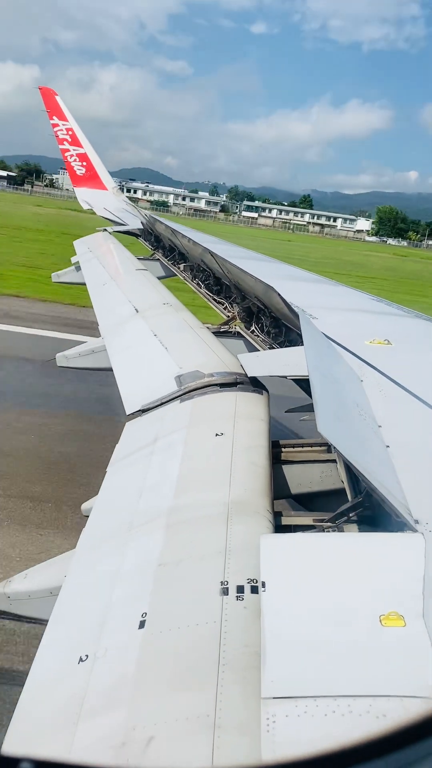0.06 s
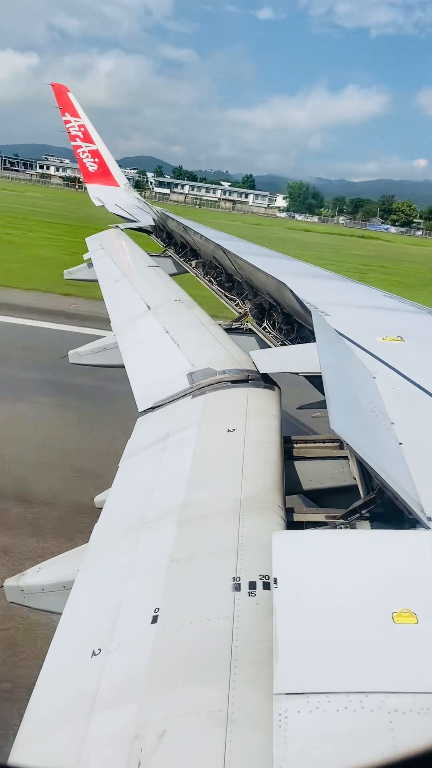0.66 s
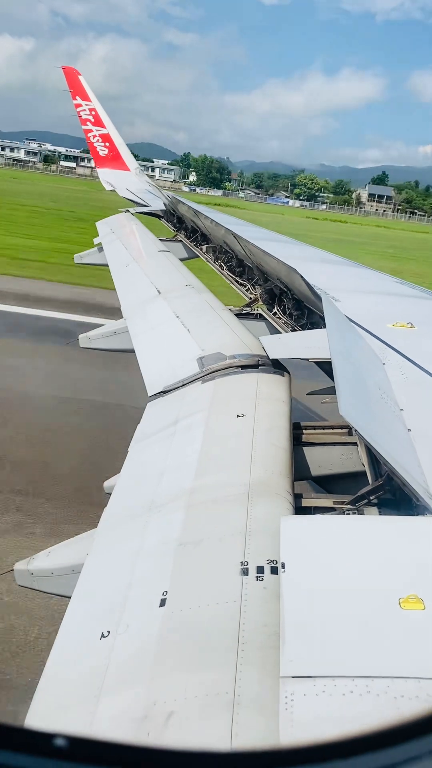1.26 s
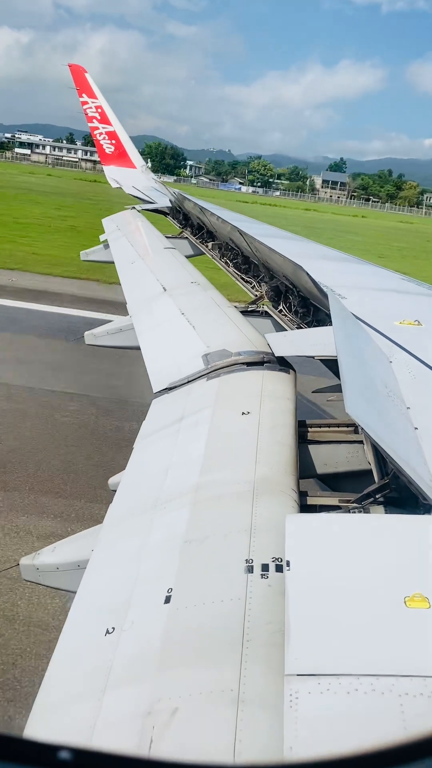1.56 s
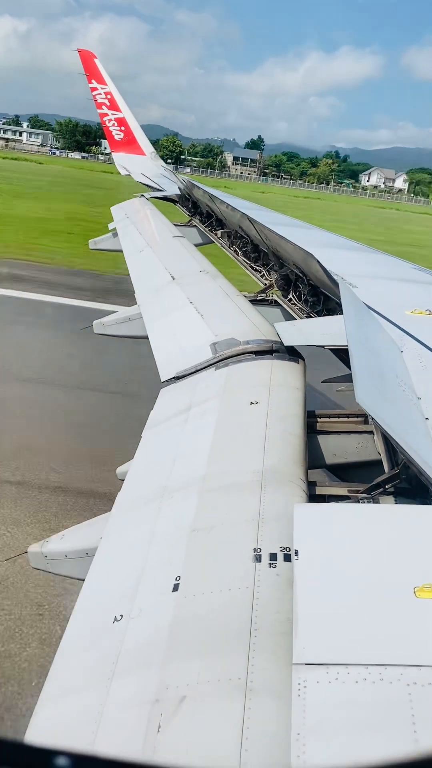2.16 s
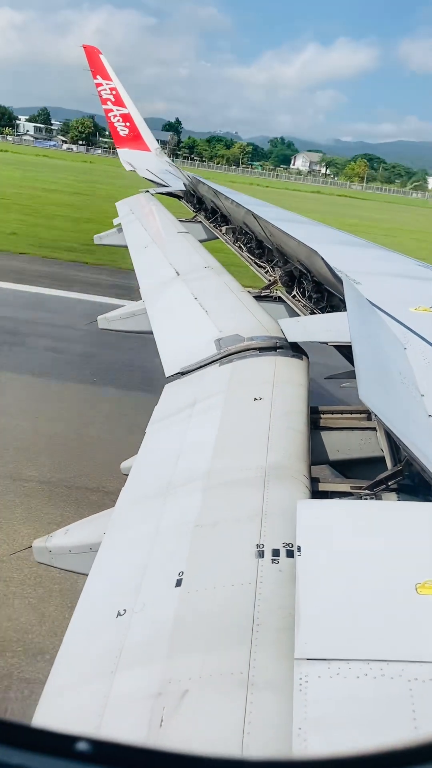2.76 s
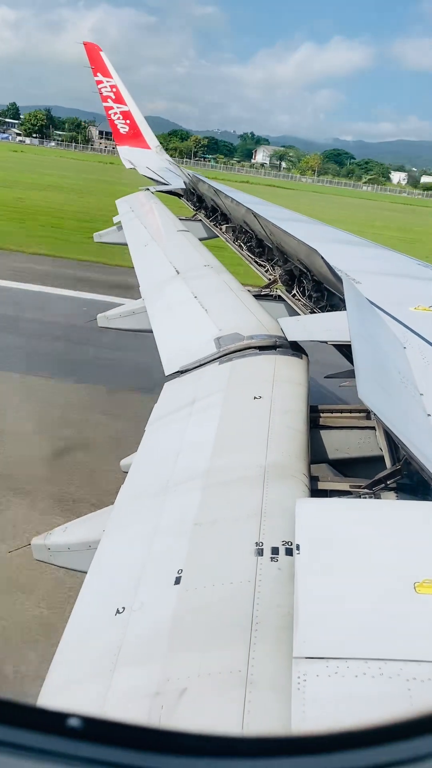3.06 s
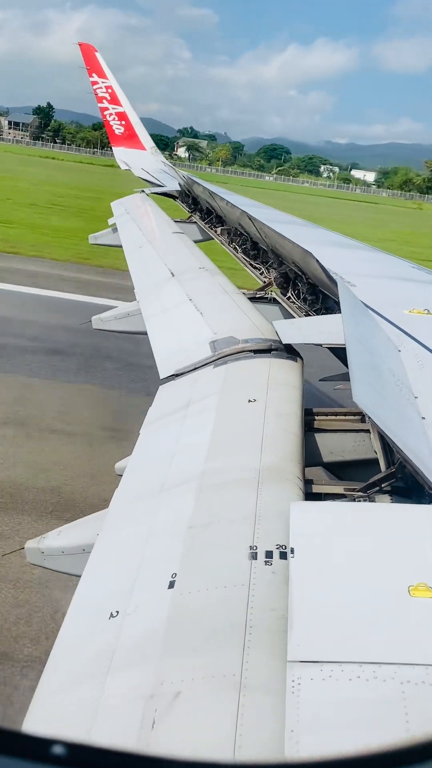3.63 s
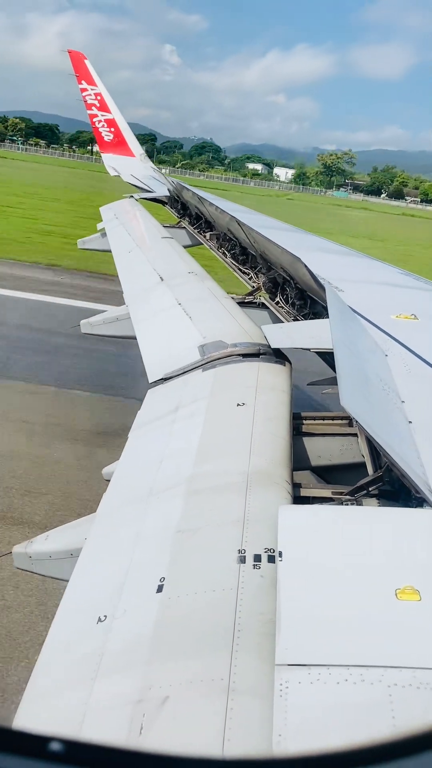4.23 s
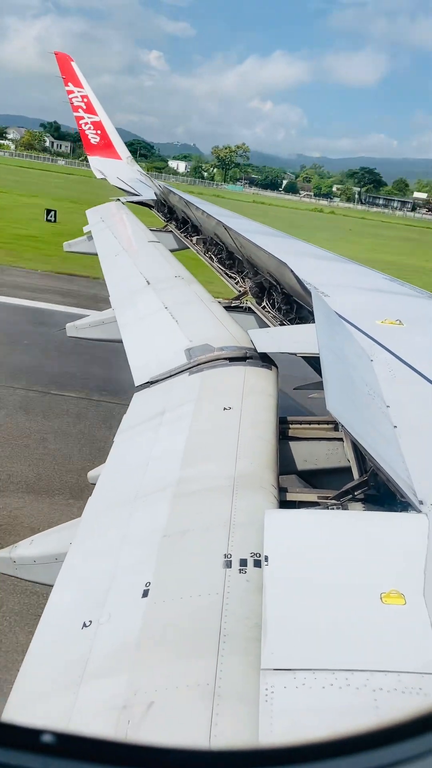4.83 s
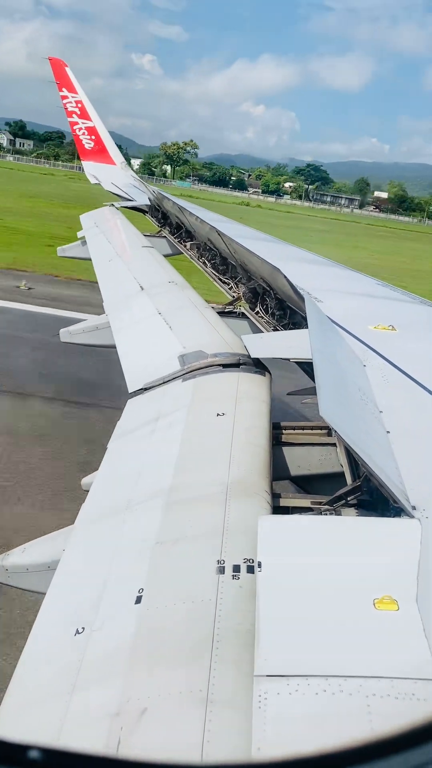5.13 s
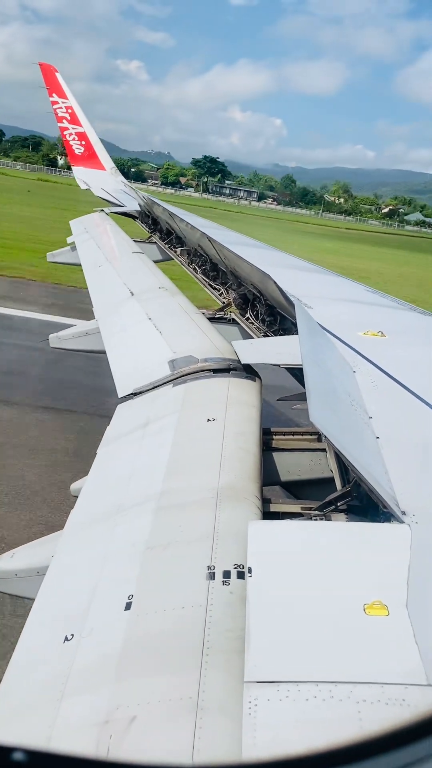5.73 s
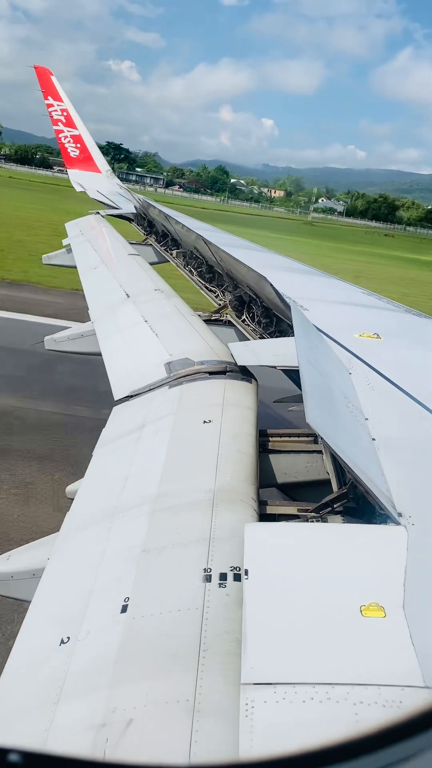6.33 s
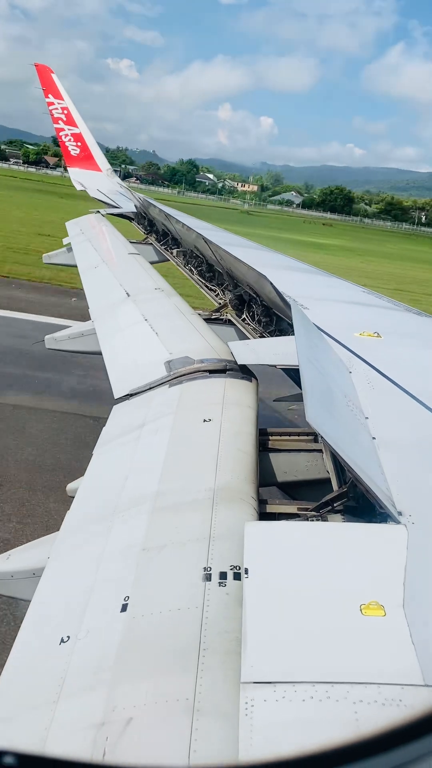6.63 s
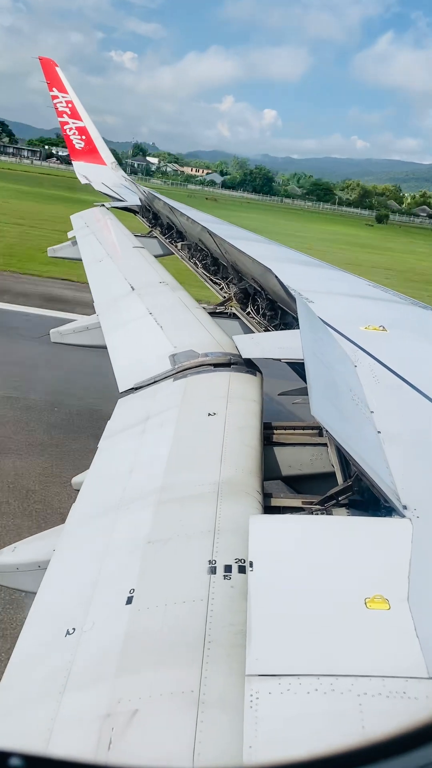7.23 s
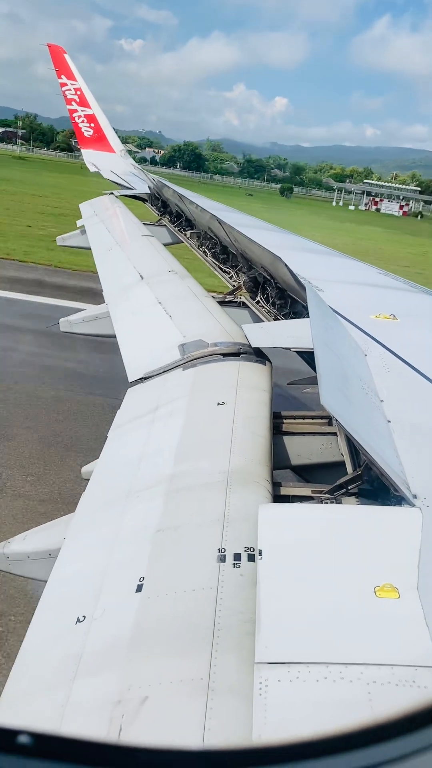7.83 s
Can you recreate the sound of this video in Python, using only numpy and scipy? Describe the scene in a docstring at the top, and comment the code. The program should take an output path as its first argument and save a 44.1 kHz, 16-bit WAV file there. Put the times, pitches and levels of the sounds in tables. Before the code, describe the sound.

Deep wheel rumble and engine hum drone inside an airliner rolling along a runway, while cabin trim ticks faintly.

```python
"""Runway rumble in a slowing airliner, heard from a window seat over the wing.
The rough surface shakes the cabin; out-of-round tyres drone on orders of their falling spin rate.
Engine hum sinks to idle, a pump and fans whine, air rushes past the spoilers.
Shaken trim chatters, buzzes, ticks and squeaks; a fitting clinks, a locker knocks, the lining thuds.
A limiter holds the peaks."""
import sys
import numpy as np
from scipy import signal
from scipy.fft import rfft, irfft, next_fast_len
from scipy.io import wavfile
from scipy.ndimage import uniform_filter1d, minimum_filter1d, map_coordinates

SR = 44100
rng = np.random.default_rng(int(sys.argv[2]) if len(sys.argv) > 2 else 0)


def generate_wav(signal):
    """Clip the signal to [-1, 1] and save it as 16-bit WAV at the path in sys.argv[1]."""
    frames = np.transpose(np.atleast_2d(signal))
    scaled = np.clip(frames, -1, 1) * 32767
    pcm = np.round(scaled).astype(np.int16)
    wavfile.write(sys.argv[1], SR, pcm)


N = 351918

# wheel spin under braking: t/s, f/Hz
SPIN_HZ = [(0, 17.17), (6, 14.22), (8, 12.9)]
# noise spectra: f/Hz, relative density/dB
RUMBLE_SPECTRUM = [(12, -23.5), (25, -12), (36, -7.5), (47, -0.5), (60, 0.5), (70, 1), (88, 5), (112, -1.5),
                   (132, -4), (155, -2.5), (200, -11), (260, -25.5), (400, -91.5)]
BOOM_SPECTRUM = [(130, -20), (200, -2.5), (240, 0.5), (280, -2), (325, 0.5), (375, -5), (440, -10),
                 (520, -15.5), (620, -34), (1000, -85.5)]
AIR_SPECTRUM = [(250, -14.5), (450, 4), (540, 2), (630, 0), (770, 3), (870, -4), (1120, -10), (1280, -11),
                (1550, -16), (1770, -19), (2000, -18), (2600, -19.5), (3700, -25.5), (5500, -29.5),
                (9000, -37), (12000, -40), (13500, -48.5)]
CHATTER_SPECTRUM = [(700, -23), (1500, -1.5), (2600, -0.5), (3300, 1), (3850, -2.5), (4350, 3),
                    (4800, -1.5), (5800, -5), (9200, -8.5), (12000, -9.5), (13200, -21), (15500, -29.5)]
CLACK_SPECTRUM = [(700, -32), (1500, -6), (2700, 4.5), (4000, -1.5), (5800, -3), (8000, -13.5),
                  (15000, -20.5)]
SNAP_SPECTRUM = [(3000, -26), (6000, -4), (10000, 0.5), (13000, -3), (16000, -7.5)]
LOCKER_SPECTRUM = [(400, -17), (650, -4), (800, 2), (950, -8.5), (1300, -19.5), (2000, -24.5), (4000, -43),
                   (9000, -75)]
LINING_SPECTRUM = [(250, -20), (480, 3.5), (750, -5), (1300, -19), (3000, -45), (9000, -85.5)]
# runway roughness: t/s, boom gain/dB
BUMPS_DB = [(0, 0.5), (.2, 2.5), (.7, 0.5), (1.3, 0.9), (2, 1), (2.6, -1.1), (2.95, 0.8), (3.9, -1),
            (5, -0.3), (5.8, -1.5), (6.95, 1.5), (7.9, 0.7)]
# tyre pushes: spin order, level/dB
TYRE_ORDERS = [(3, -1.5), (4, 1), (5, 1), (7, 1.5), (8, -2)]
# gear-to-cabin response: f/Hz, gain/dB
AIRFRAME_DB = [(40, -29), (47, -25), (48.8, -13), (51, -11), (52.5, -18.5), (54.5, -13.5), (57, -18),
               (60.5, -13), (63, -17.5), (67, -24.5), (73, -34.5), (77.5, -23), (79.5, -13.5),
               (82.6, -12.5), (83.8, -24.5), (86, -27), (101, -26.5), (107, -25), (113, -28.5), (120, -21),
               (126, -27.5), (140, -25.5)]
# engine run-down: t/s, f/Hz
ENGINE_HZ = [(0, 457.3), (3.0, 419), (3.8, 409.4), (4.3, 408.8), (8, 406.2)]
# panel resonances for engine harmonics 3 and 4: f/Hz, half-width/Hz, level/dB
PANEL_MODES = [(1367, 10, -54), (1663, 24, -56.3)]
# source envelopes: t/s, relative level/dB
HUM_DB = [(0, -39), (1.2, -38), (2.55, -45), (2.9, -30), (3.3, -40), (3.95, -40), (4.2, -33.5), (5.3, -30),
          (5.65, -32), (6, -30.5), (6.55, -30.5), (7.05, -41), (7.4, -31.5), (7.9, -39.5)]
PUMP_DB = [(0, -57), (1.3, -49), (1.7, -55.5), (4.5, -53.5), (5, -49.5), (5.5, -51.5), (6.2, -53.5),
           (6.45, -45.5), (6.8, -45.5), (7.3, -49.5), (7.55, -44.5), (8, -50.5)]
AIR_SWELL_DB = [(0, 0), (.8, 0.2), (2.25, 0.9), (3.2, 0.3), (5.1, 0), (5.75, -0.4), (6.25, -1), (6.8, 0.3),
                (7.7, 1.4)]
CHATTER_DB = [(0, -56), (.3, -55), (.45, -49), (.75, -46.5), (1.2, -50), (1.45, -57), (2.15, -58),
              (3.1, -51.5), (4.4, -49.5), (5.1, -50.5), (5.45, -53.5), (6.4, -52.5), (6.7, -49),
              (7.28, -49.5), (7.37, -60.5), (7.46, -49), (7.58, -45.5), (7.78, -56), (8, -52)]
RATTLE_DB = [(0, -63), (.7, -58.5), (1.5, -61.5), (3.3, -58), (5, -61.5), (6.5, -65), (7.1, -63.5),
             (7.6, -60.5)]
# fans and electrics: f/Hz, level/dB
WHINES = [(2639, -66.5), (3628, -65)]
# air and nearby trim at spaced microphones: f/Hz, left-right coherence (clipped to +-1 in use)
AIR_COHERENCE = [(300, 0.14), (750, 0.039), (1200, 0.17), (1950, 0.64), (3000, -0.11), (4200, 0.42),
                 (4700, -0.055), (5400, 0.6), (6300, -0.54), (7300, -3.1), (8600, -0.12), (10700, 1),
                 (13200, 0.85), (15500, .5)]
TRIM_COHERENCE = [(1500, 0), (4500, 0), (5500, 1), (7300, 1), (11000, 0.66), (15000, 0.48)]
# buzzing fittings: f/Hz, relative level/dB
RATTLES = [(1265, -5), (1970, -4), (2500, 1), (2760, -4), (4310, -5.5)]
# trim contacts: t/s, relative level/dB, snap gain/dB, t60/s
TICKS = [(0.198, -36, -7.5, .06), (0.6185, -33.5, -14.5, .08), (0.7072, -30.5, -7, .06),
         (0.714, -32.5, -8, .08), (1.0148, -36, -12, .05), (1.052, -30.5, -24.5, .04),
         (1.1757, -26.5, -26.5, 0.071), (1.2707, -28.5, -23, .045), (1.6868, -30.5, -8, 0.11),
         (1.9485, -33, -20, .08), (2.2605, -28.5, -28, .06), (2.655, -33, -20, .14),
         (2.8448, -30.5, -18.5, .09), (3.1009, -29, -15.5, .09), (3.362, -31, -16.5, .09),
         (3.5029, -31, -7.5, .055), (3.537, -33, -10.5, .06), (3.676, -33.5, -12.5, .06),
         (3.8046, -33, -12.5, .06), (3.9731, -35, -9.5, .06), (4.4064, -33.5, -15.5, .1),
         (4.4435, -32, -17.5, .1), (4.6044, -34, -7.5, .09), (5.06, -31, -19, 0.077),
         (5.0826, -32, -15, 0.07), (5.7887, -36.5, -14, .1), (5.8865, -34, -18.5, .06),
         (6.1789, -35, -12.5, .05), (6.5973, -32.5, -7.5, .07), (6.988, -25, -14.5, 0.035),
         (7.1232, -32, -18, .12), (7.2125, -32.5, -7, .04), (7.231, -35.5, -10.5, 0.06),
         (7.27, -29.5, -9, .06), (7.282, -30.5, -12.5, .05), (7.2968, -28, -11, 0.1),
         (7.453, -29, -14, .037), (7.5281, -29, -9, .06), (7.55, -29, -6, .045), (7.6842, -31.5, -7.5, .14),
         (7.7674, -33, -9, .06), (7.7774, -32.5, -12, 0.062), (7.8171, -35.5, -9, .07),
         (7.863, -35, -10.5, .05), (7.8745, -32, -9.5, .09), (7.9374, -33, -6.5, .11)]
# panel rubs: t/s, length/s, f/Hz, level/dB
SQUEAKS = [(0.617, 0.03, 3100, -49), (0.64, 0.024, 2890, -46), (0.703, 0.019, 2830, -50),
           (0.707, 0.036, 6130, -55), (1.682, 0.018, 2810, -44), (1.698, 0.028, 2880, -46),
           (1.679, 0.056, 6170, -54), (7.296, 0.03, 3130, -48), (7.378, 0.077, 3335, -48),
           (7.478, 0.087, 3280, -55)]
# metal fitting modes: f/Hz, gain/dB, t60/s
FITTING_MODES = [(4102, -8, .15), (5500, -5.5, 0.14), (9205, -15.5, .1)]
# blows on fitting, locker and lining: t/s, level/dB
CLINKS = [(1.054, -51), (1.177, -46), (1.272, -47.5), (7.69, -47), (7.876, -42)]
KNOCKS = [(1.172, -25.5), (5.06, -27.5), (6.098, -27.5), (6.165, -28)]
THUDS = [(2.965, -25.5), (7.465, -31)]


def amp(db):
    """Decibels to gain."""
    return 10 ** (np.asarray(db) / 20)


def unit(x):
    """x at rms 1."""
    return x / np.sqrt(np.mean(x ** 2) + 1e-20)


def at_hz(table, hz):
    """Table read on a log frequency axis."""
    knots_hz, values = np.transpose(table)
    return np.interp(np.log(hz + 1), np.log(knots_hz + 1), values)


def curve(table):
    """Time table read at every sample."""
    return np.interp(np.arange(N) / SR, *np.transpose(table))


def wobble(rate_hz):
    """Smooth random curve, rate_hz knots a second."""
    knots = rng.standard_normal(int(N * rate_hz / SR) + 4)
    return map_coordinates(knots, [np.arange(N) * rate_hz / SR])


def filtered(x, response):
    """x through a frequency response."""
    size = next_fast_len(N + SR // 2)
    return irfft(rfft(x, size) * response(np.fft.rfftfreq(size, 1 / SR)), size)[..., :N]


def noise(spectrum, coherence, patchy_db=0):
    """Coloured stereo noise, rms 1, with time-frequency patches of random gain."""
    bins = signal.stft(rng.standard_normal((2, N)), nperseg=512)[2]
    patches = uniform_filter1d(rng.standard_normal(bins.shape[1:]), size=4, axis=0)
    patches = unit(uniform_filter1d(patches, size=10, axis=1))
    pair = signal.istft(bins * amp(patchy_db * patches), nperseg=512)[1][:, :N]

    def mid_side(hz):
        angle_rad = np.arccos(np.clip(at_hz(coherence, hz), -1, 1)) / 2
        return amp(at_hz(spectrum, hz)) * [np.cos(angle_rad), np.sin(angle_rad)]

    mid, side = filtered(pair, mid_side)
    return unit(np.array([mid + side, mid - side]))


def tone(hz, drift_rad, drift_hz):
    """Sine with wandering phase, rms 1."""
    phase_rad = 2 * np.pi * (np.cumsum(hz * np.ones(N)) / SR + rng.random())
    return np.sqrt(2) * np.sin(phase_rad + drift_rad * wobble(drift_hz))


def flutter(hz, half_width_hz):
    """Narrow noise, rms 1: a flickering whine."""
    return unit(filtered(rng.standard_normal(N), lambda f: 1 / (1 + ((f - hz) / half_width_hz) ** 4)))


def contacts(rate_hz, spread_db):
    """Times and gains of random contacts, mostly light."""
    gaps, strengths = -np.log(1 - rng.random((4000, 2))).T
    times_s = np.cumsum(gaps) / rate_hz
    inside = times_s < N / SR
    return times_s[inside], amp(spread_db * np.minimum(strengths[inside], np.pi))


def bursts(times_s, gains, t60_s):
    """Envelope of sudden, decaying contacts; powers add."""
    power = np.bincount(np.clip(times_s * SR, 0, N - 1).astype(int), gains ** 2, N)
    return np.sqrt(signal.lfilter([1], [1, -amp(-120 / (t60_s * SR))], power))


def slowing_db(spin_hz, start_db, db_per_halving):
    """Noise level falling with wheel speed."""
    return start_db + db_per_halving * np.log2(spin_hz / spin_hz[0])


def runway(spin_hz):
    """The rough surface shakes the fuselage and booms on bumps; long waves reach both sides alike."""
    rumble = noise(RUMBLE_SPECTRUM, [(100, 0.9998)])
    boom = noise(BOOM_SPECTRUM, [(330, 0.99), (500, 0.97)])
    rumble_db = slowing_db(spin_hz, start_db=-9, db_per_halving=5.3) + 0.7 * wobble(4)
    boom_db = slowing_db(spin_hz, start_db=-19.5, db_per_halving=10.5) + 0.45 * wobble(5)
    return amp(rumble_db) * rumble + amp(boom_db + curve(BUMPS_DB)) * boom


def wheels(spin_hz):
    """Out-of-round tyres push on the gear; each order swells as it falls through a resonance."""
    drone = np.zeros(N)
    for order, db in TYRE_ORDERS:
        hz = order * spin_hz
        level_db = db + at_hz(AIRFRAME_DB, hz) + 0.82 * wobble(4.5)
        drone += amp(level_db) * tone(hz, drift_rad=0.11, drift_hz=5)
    return drone


def engine():
    """Hum falling to idle; harmonics sweep panel resonances, a standing wave sets the sides apart."""
    hz, hum_db = curve(ENGINE_HZ), curve(HUM_DB)
    hum = amp(hum_db) * tone(hz, drift_rad=0.12, drift_hz=6)
    for order, (mode_hz, half_width_hz, db) in enumerate(PANEL_MODES, 3):
        resonance = 1 / (1 + ((order * hz - mode_hz) / half_width_hz) ** 8)
        hum += amp(db) * resonance * tone(order * hz, drift_rad=0.24, drift_hz=12)
    octave = amp(hum_db - 18) * tone(2 * hz, drift_rad=0.15, drift_hz=9.9)
    standing_wave = amp(-43.5) * tone(hz, drift_rad=0.3, drift_hz=6)
    return hum + octave + np.outer([1, -1], standing_wave)


def pump():
    """Hydraulic pump tone; its level follows the load."""
    level_db = curve(PUMP_DB) + 0.6 * wobble(2.6)
    return amp(level_db) * tone(hz=915, drift_rad=0.1, drift_hz=7.5) * amp([[1.5], [-1.5]])


def fans():
    """Fans and electrics whine thinly: half narrow noise, half tone."""
    return sum(amp(db - 3) * (flutter(hz, half_width_hz=16) + tone(hz, drift_rad=0.7, drift_hz=36))
               for hz, db in WHINES)


def airflow(spin_hz):
    """Turbulence over the spoilers, slightly stronger on the window side."""
    level_db = slowing_db(spin_hz, start_db=-30.5, db_per_halving=10.5) + curve(AIR_SWELL_DB)
    air = amp(level_db + 0.38 * wobble(9)) * noise(AIR_SPECTRUM, AIR_COHERENCE, patchy_db=1.56)
    lean_db = [(300, 0), (520, 2), (800, 1.5), (1200, 0.5), (1800, 0)]
    return filtered(air, lambda hz: amp(np.outer([1, -1], at_hz(lean_db, hz))))


def chatter():
    """Shaken panels scuff each other in soft clumps."""
    scuffs = bursts(*contacts(rate_hz=230, spread_db=2.4), t60_s=0.055)
    clumps = unit(scuffs * amp(1.9 * wobble(24)))
    return amp(curve(CHATTER_DB) - 1.95) * clumps * noise(CHATTER_SPECTRUM, TRIM_COHERENCE, patchy_db=3)


def rattles():
    """Small loose fittings buzz, each at its own pitch."""
    buzz = np.zeros((2, N))
    for hz, db in RATTLES:
        envelope = unit(bursts(*contacts(rate_hz=60, spread_db=2.2), t60_s=0.065))
        ring = np.array([flutter(hz, half_width_hz=95) for _ in range(2)])
        buzz += amp(db) * envelope * unit(ring + 0.26 * ring[::-1])
    return amp(curve(RATTLE_DB)) * buzz


def ticks(attack_s=0.00035, crack_db=-3, crack_t60_s=0.0088):
    """Harder trim contacts: a plastic clack under a bright snap."""
    clack_power, snap_power = np.zeros((2, N))
    for time_s, db, snap_db, t60_s in TICKS:
        start = int(time_s * SR)
        age_s = np.arange(min(SR // 4, N - start)) / SR
        crack = amp(crack_db - 60 * age_s / crack_t60_s)
        ring = amp(-60 * age_s / t60_s)
        envelope = amp(db) * (crack + ring) * (1 - np.exp(-age_s / attack_s))
        clack_power[start:start + len(age_s)] += envelope ** 2
        snap_power[start:start + len(age_s)] += (amp(snap_db) * envelope) ** 2
    clack = np.sqrt(clack_power) * noise(CLACK_SPECTRUM, TRIM_COHERENCE, patchy_db=2.5)
    snap = np.sqrt(snap_power) * noise(SNAP_SPECTRUM, TRIM_COHERENCE, patchy_db=6.5)
    return amp(-9) * clack + amp(-2.5) * snap


def squeaks(sag_hz_per_s=700):
    """A panel edge sticks and slips: a brief, rough, sagging tone."""
    out = np.zeros(N)
    for time_s, length_s, hz, db in SQUEAKS:
        age_s = np.clip(np.arange(N) / SR - time_s, 0, length_s)
        envelope = amp(db) * np.sin(np.pi * age_s / length_s)
        out += envelope * tone(hz - sag_hz_per_s * age_s, drift_rad=0.45, drift_hz=220)
    return out


def clinks():
    """A jolted metal fitting rings briefly."""
    times_s, db = np.transpose(CLINKS)
    return sum(bursts(times_s, amp(db + mode_db), t60_s) * tone(hz, drift_rad=0.6, drift_hz=230)
               for hz, mode_db, t60_s in FITTING_MODES)


def knocks():
    """An overhead locker shifts against its catch: short, hollow."""
    times_s, db = np.transpose(KNOCKS)
    envelope = uniform_filter1d(bursts(times_s, amp(db), t60_s=0.09), size=100)
    return envelope * noise(LOCKER_SPECTRUM, [(700, 0.6)])


def thuds():
    """Runway jolts knock the cabin lining dully."""
    times_s, db = np.transpose(THUDS)
    envelope = uniform_filter1d(bursts(times_s, amp(db), t60_s=0.38), size=300)
    return envelope * noise(LINING_SPECTRUM, [(400, 0.93), (900, 0.3)])


def window_side(x, lead_s=0.0002024):
    """Window-side sound reaches the left microphone first."""
    return filtered(x, lambda hz: np.exp(1j * np.pi * lead_s * np.outer([1, -1], hz)))


def scene():
    """Stereo sum at the seat."""
    spin_hz = curve(SPIN_HZ)
    trim = window_side(chatter() + ticks() + clinks()) + rattles() + squeaks() + thuds() + knocks()
    return runway(spin_hz) + wheels(spin_hz) + engine() + pump() + fans() + airflow(spin_hz) + trim


def record(dry):
    """Fast look-ahead limiter, end fades, low-pass."""
    ceiling, fade_s, cutoff_hz = 0.89, 0.004, 15830
    needed_gain = np.minimum(1, ceiling / (np.abs(dry).max(axis=0) + 1e-9))
    gain = uniform_filter1d(minimum_filter1d(needed_gain, size=500), size=500)
    to_edge_s = np.minimum(np.arange(N), np.arange(N)[::-1]) / SR
    fade = np.sin(np.pi / 2 * np.minimum(1, to_edge_s / fade_s)) ** 2
    return filtered(dry * gain * fade, lambda hz: hz < cutoff_hz)


dry = scene()
out = record(dry)
generate_wav(out)
```